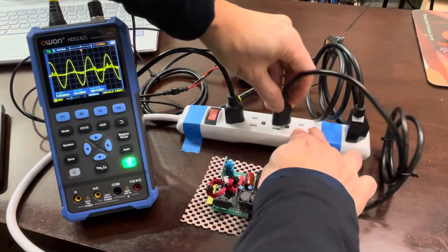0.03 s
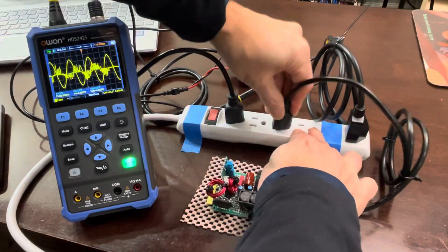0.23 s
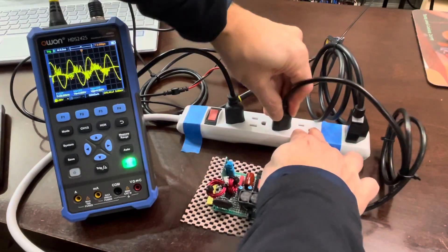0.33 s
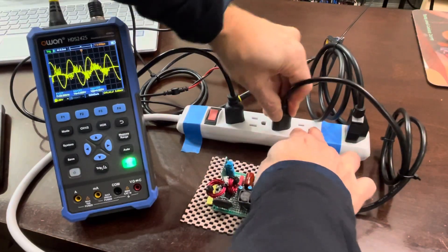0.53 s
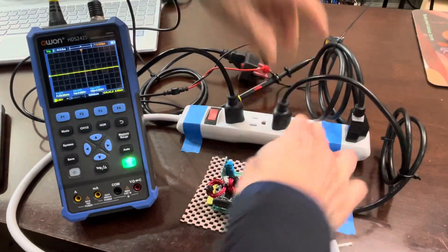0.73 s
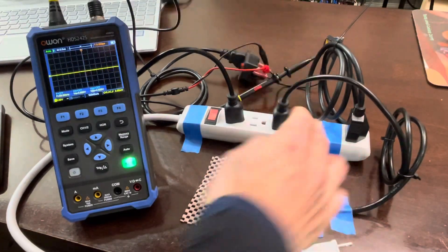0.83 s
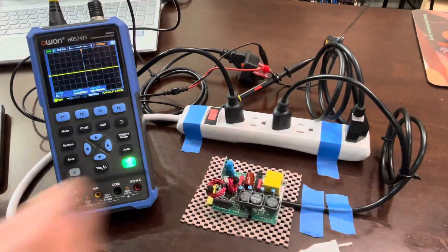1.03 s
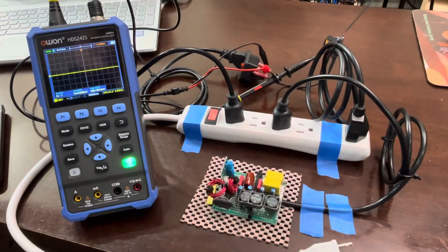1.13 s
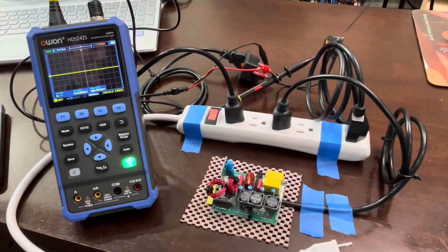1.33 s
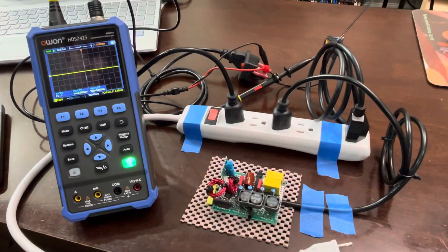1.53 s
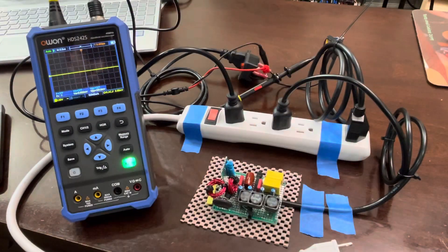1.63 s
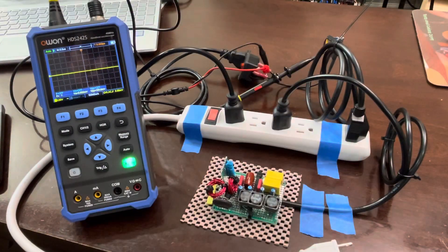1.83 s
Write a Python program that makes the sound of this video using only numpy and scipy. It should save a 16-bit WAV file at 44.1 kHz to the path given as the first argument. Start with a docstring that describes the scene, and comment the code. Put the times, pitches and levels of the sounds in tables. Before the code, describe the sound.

Close-miked plug going into a socket strip on a workbench, small scratchy contacts first, then a hard bright snap and low thump, weaker clicks afterwards, faint cloth brushing over quiet low ventilation rumble in a small room.

```python
"""A mains plug is pushed into a plastic power strip taped to a workbench, close to the microphone.
Prongs stick and slip as rough chirps; contacts crack with filtered noise and ring the casing's modes.
Each push thunks the modes of the bench top; the casing clicks again as the hands let go.
A sleeve brushes past as grainy cloth noise, and a diffuse small room answers plug and bench.
Beneath lie a low ventilation rumble, a wavering hum and faint hiss."""
import sys
import numpy as np
from scipy import signal
from scipy.fft import rfft, irfft, next_fast_len
from scipy.io import wavfile
from scipy.ndimage import map_coordinates

SR = 44100
rng = np.random.default_rng(int(sys.argv[2]) if len(sys.argv) > 2 else 0)


def store_wav(level_fs):
    """Save 16-bit WAV to argv[1]."""
    pcm = np.round(np.clip(np.atleast_2d(level_fs), -1, 1) * 32767)
    wavfile.write(sys.argv[1], SR, pcm.T.astype(np.int16))


N = 83790

# ventilation rumble spectrum: (frequency [Hz], relative level [dB])
RUMBLE_SPECTRUM = [(20, -13), (35, -9), (55, -0.5), (90, 1), (130, -3), (175, -5.5), (250, -21),
                   (400, -29.5), (700, -46), (2000, -70)]
# faint hiss spectrum: (frequency [Hz], relative level [dB])
HISS_SPECTRUM = [(100, 5.5), (500, 3), (1300, 0), (2500, -1.5), (6500, -5.5), (9000, -5), (10200, -18),
                 (11300, -2), (12300, -9), (13300, -29)]
# hum level before its random wavering: (time [s], level [dB])
HUM_LEVELS = [(0, -57), (.7, -58), (0.781, -50), (0.901, -65), (1.281, -61.5), (1.36, -54), (1.53, -49.5),
              (1.6, -61.5), (1.9, -62.5)]
# sleeve brushes: (start [s], rise [s], fall to -60 dB [s], level [dB], middle treble corner [Hz])
BRUSHES = [(0, 0.015, 0.29, -47, 2140), (0.422, 0.0075, 0.51, -51, 3130), (.96, 0.028, 0.6, -67, 4970),
           (1.178, .005, 0.2963, -54, 3770), (1.49, 0.098, 1.1, -65, 4944),
           (1.599, 0.068, 0.1645, -44, 3085)]
# brushing cloth spectrum: (frequency [Hz], relative level [dB])
CLOTH_SPECTRUM = [(40, -5.5), (100, 6), (350, 8.5), (600, 3), (1200, 0), (2500, 1), (4500, -4.5),
                  (9000, -6), (13000, -18)]
# cloth sliding lightly: (middle [s], half length [s], level [dB])
SLIDES = [(.79, .05, -83), (1.102, 0.027, -78.5), (1.22, 0.037, -65.5), (1.584, .025, -76),
          (1.739, 0.024, -68), (1.807, 0.048, -63)]
# sliding cloth spectrum: (frequency [Hz], relative level [dB])
SLIDE_SPECTRUM = [(500, -13), (3000, -4), (6500, -8.5), (8800, 8), (9600, 1), (10200, -11), (11200, 4),
                  (12100, -11), (13000, -35)]
# contacts of plug and casing:
# (time [s], casing ring level [dB], crack level [dB], dull above [Hz], ring pitch ratio [1])
CONTACTS = [(.0270, -37.5, -34, 6800, 1.02), (0.0298, -40.5, -36.5, 4500, 1.04),
            (0.0977, -60, -49, 3500, 1.08), (0.1664, -39.5, -57, 11100, 0.68),
            (0.1709, -71, -16, 14000, 1.44), (0.172, -16.5, -20.5, 14000, 1),
            (.1738, -36, -18.5, 12400, .8), (0.3491, -48, -51, 9000, 1.1), (0.3522, -34, -28, 1500, 0.84),
            (.5340, -63, -47, 1500, .85), (0.5556, -59, -54, 2000, .85), (0.587, -53.5, -46, 13200, 0.94),
            (0.5891, -36, -48, 2180, 0.77), (.6090, -56, -48.5, 13000, 1.06), (0.637, -57, -52, 1200, .7),
            (.6560, -64, -55, 1803, 0.74)]
# plastic casing modes at pitch ratio 1: (frequency [Hz], relative level [dB], t60 [s])
CASING_MODES = [(360, -14, 0.04), (727, -11, 0.02), (881.6, -4.5, .017), (1094, -1.5, 0.015),
                (1365, -1.5, .028), (1653, -17, .035), (2060, -11, 0.025), (2380, -14.5, 0.02),
                (2880, -12.5, .012), (3960, -14.5, .012), (4416, -7, .012), (5680, -8.5, .011),
                (8290, -9.5, .016), (9170, -10.5, .016), (11500, -4, .01)]
# contact crack spectrum: (frequency [Hz], relative level [dB])
CRACK_SPECTRUM = [(300, -13), (900, 2), (1600, -1.5), (4400, -2), (6500, -9), (8500, -0.5), (10000, -3),
                  (11200, 5.5), (12500, -3.5), (14500, -21)]
# pushes on the bench top: (time [s], level [dB], pitch of the push [Hz])
PUSHES = [(.029, -41, 302), (0.046, -39.5, 80), (0.101, -39.5, 140), (.176, -26, 200.2), (.184, -31, 80),
          (.218, -30, 70), (0.254, -42.5, 300), (0.311, -42.5, 131.3), (.353, -38, 160), (.452, -39, 66.9),
          (0.556, -46, 343.2), (0.59, -33, 139.7), (0.609, -47.5, 201.1), (1.098, -47.5, 65),
          (1.188, -52.5, 197), (1.635, -43, 70.8)]
# bench top modes: (frequency [Hz], relative level [dB], t60 [s])
BENCH_MODES = [(58, -0.5, 0.37), (106.8, 2, 0.18), (156.6, 1.5, 0.12), (180.5, -2.5, 0.2),
               (211.3, -4.5, 0.21), (257.7, -4, 0.15), (335.6, -6, .17), (390.9, -8, 0.19),
               (451, -15.5, 0.23)]
# prongs slipping in the spring contacts: (time [s], pitch [Hz], level [dB])
SLIPS = [(0.033, 1240, -44), (0.04, 1204, -38), (.048, 1570, -45.5), (0.057, 1810, -36.5),
         (.068, 1880, -51), (0.0991, 1547, -47)]
# room decay: (frequency [Hz], t60 [s])
ROOM_T60 = [(100, 0.34), (500, 0.53), (1400, 0.31), (3700, .33), (9700, .26), (13000, 0.18)]
# room colour: (frequency [Hz], gain [dB])
ROOM_GAIN = [(100, -23), (400, -3.5), (700, -6.5), (1350, -12), (1750, -3), (3500, -7), (6000, -6),
             (9000, -11), (10200, -15.5), (11500, -7.5), (12500, -18), (13300, -38)]

# *_LEFT_DB raises the left channel and lowers the right by the same amount
RUMBLE_DB, HISS_DB, HUM_HZ, BACKGROUND_LEFT_DB = -57.5, -76.5, 86.4, 1.5
CLOTH_GRAIN_DB, CLOTH_WIDTH, CLOTH_LEFT_DB = 0.5, 0.25, 3
CLOTH_DARKENS = 0.27  # a brush's corner starts this share above its middle and ends as far below
CRACK_RISE_S, CRACK_T60_S, CRACK_WIDTH = 0.0004, 0.013, 0.8
CASING_RISE_S, CASING_LEAD_S = 0.00035, 0.00003  # the ring reaches the left ear first by the lead
CLICK_LEFT_DB = 1
BENCH_RISE_S, BENCH_LEFT_DB = 0.002, 0.6
PUSH_LOSS_DB_PER_OCTAVE = 7  # for modes away from the pitch of the push
SLIP_RISE_S, SLIP_T60_S, SLIP_ROUGH_RAD = 0.0007, 0.018, 0.95
ROOM_DELAY_S, ROOM_BUILD_S = 0.0013, 0.0034
LOW_CUT_HZ, TOP_HZ = 48, 14454


def amp(db):
    """Decibels to gain."""
    return 10 ** (np.asarray(db) / 20)


def unit(x):
    """Scale to rms 1."""
    return x / np.sqrt(np.mean(x ** 2) + 1e-20)


def along(points, hz):
    """(Hz, value) points read on a log frequency axis."""
    f, v = np.transpose(points)
    return np.interp(np.log(hz + 1), np.log(f + 1), v)


def since(s):
    """Seconds since s, zero before it."""
    return np.maximum(np.arange(N) / SR - s, 0)


def filtered(x, response):
    """x shaped by a gain that is a function of frequency."""
    padded = next_fast_len(N + 8192)
    hz = np.fft.rfftfreq(padded, 1 / SR)
    return irfft(rfft(x, padded) * response(hz), padded)[..., :N]


def wobble(rate):
    """A smooth random curve through rate normal draws a second."""
    knots = rng.standard_normal(int(N * rate / SR) + 4)
    return map_coordinates(knots, [np.arange(N) * rate / SR])


def noise(spectrum, width):
    """Coloured stereo noise of rms 1; width is side over mid."""
    mid, side = filtered(rng.standard_normal((2, N)), lambda hz: amp(along(spectrum, hz)))
    return unit(np.array([mid + width * side, mid - width * side]))


def dull(x, corner_hz):
    """Soft contact loses its treble."""
    sos = signal.butter(2, min(corner_hz, 0.45 * SR), fs=SR, output="sos")
    return signal.sosfilt(sos, x + 1e-20)


def struck(t, rise, t60):
    """A quick rise and an exponential decay."""
    return (1 - np.exp(-t / rise)) * amp(-60 * t / t60)


def pan(left_db):
    """Gains of the two channels: left up, right down."""
    return amp([[left_db], [-left_db]])


def background():
    """Steady low-heavy rumble and faint hiss, with a hum that wavers in phase and level."""
    t = since(0)
    hum_level_db = np.interp(t, *np.transpose(HUM_LEVELS))
    hum = np.sin(2 * np.pi * HUM_HZ * t + 0.36 * wobble(6.9))
    hum = hum * amp(hum_level_db + 3.1 * wobble(15))
    rumble = amp(RUMBLE_DB) * noise(RUMBLE_SPECTRUM, width=0.14)
    hiss = amp(HISS_DB) * noise(HISS_SPECTRUM, width=1.0)
    return (rumble + hum + hiss) * pan(BACKGROUND_LEFT_DB)


def sleeve():
    """Grainy cloth: brushes that darken as they slow, and light hissing slides."""
    cloth = unit(noise(CLOTH_SPECTRUM, CLOTH_WIDTH) * amp(CLOTH_GRAIN_DB * wobble(220)))
    brushes = np.zeros((2, N))
    for s, rise, fall, db, corner_hz in BRUSHES:
        t = since(s)
        bright, dark = [
            filtered(cloth, lambda hz: 1 / np.sqrt(1 + (hz / (corner_hz * k)) ** 10))
            for k in (1 + CLOTH_DARKENS, 1 - CLOTH_DARKENS)]
        fast = np.exp(-t / (0.15 * fall))  # crossfades bright into dark
        brushes += amp(db) * struck(t, rise, fall) * (fast * bright + (1 - fast) * dark)
    speed = sum(amp(db) * np.exp(-0.5 * ((since(0) - s) / half) ** 2) for s, half, db in SLIDES)
    slides = speed * noise(SLIDE_SPECTRUM, width=0.93) * amp(2.21 * wobble(70))
    return (brushes + slides) * pan(CLOTH_LEFT_DB)


def clicks():
    """Each contact gives a short noisy crack and rings the modes of the casing."""
    out = np.zeros((2, N))
    cracks = noise(CRACK_SPECTRUM, CRACK_WIDTH)
    for s, ring_db, crack_db, corner_hz, ratio in CONTACTS:
        start = int(s * SR)
        span = slice(start, start + SR // 16)
        t = since(s)[span]
        ears = np.array([t, np.maximum(t - CASING_LEAD_S, 0)])
        ring = np.zeros_like(ears)
        for k, (hz, db, t60) in enumerate(CASING_MODES):
            mode = struck(ears, CASING_RISE_S, t60) * np.sin(2 * np.pi * hz * ratio * ears)
            ring += (-1) ** k * amp(db) * mode  # neighbouring modes start in opposite directions
        crack = cracks[:, span] * struck(t, CRACK_RISE_S, CRACK_T60_S)
        out[:, span] += dull(amp(ring_db) * ring + amp(crack_db) * crack, corner_hz)
    return out * pan(CLICK_LEFT_DB)


def bench():
    """The push passes through the strip into the bench top; slower pushes wake its lower modes."""
    out = np.zeros(N)
    for s, push_db, push_hz in PUSHES:
        start = int(s * SR)
        span = slice(start, start + SR // 2)
        t = since(s)[span]
        for hz, db, t60 in BENCH_MODES:
            octaves_away = abs(np.log2(hz / push_hz))
            level = amp(push_db + db - PUSH_LOSS_DB_PER_OCTAVE * octaves_away)
            out[span] += level * struck(t, BENCH_RISE_S, t60) * np.sin(2 * np.pi * hz * t)
    return out * pan(BENCH_LEFT_DB)


def prongs():
    """The prongs stick and slip on their way in: tiny chirps, roughened by a random phase."""
    rough = SLIP_ROUGH_RAD * wobble(1000)
    out = np.zeros(N)
    for s, hz, db in SLIPS:
        t = since(s)
        out += amp(db) * struck(t, SLIP_RISE_S, SLIP_T60_S) * np.sin(2 * np.pi * hz * t + rough)
    return out


def room(x):
    """Diffuse reflections: a decaying noise tail for each ear, the high treble dying first."""
    hz, t, cells = signal.stft(rng.standard_normal((2, SR // 2)), SR, nperseg=256)
    decay = amp(-60 * t / along(ROOM_T60, hz)[:, None])
    tail = signal.istft(cells * decay, SR, nperseg=256)[1]
    tail = tail * (1 - np.exp(-since(ROOM_DELAY_S)[:tail.shape[1]] / ROOM_BUILD_S))
    wet = signal.fftconvolve(x, tail / np.linalg.norm(tail[0]), axes=1)[:, :N]
    return filtered(wet, lambda hz: amp(along(ROOM_GAIN, hz)))


def scene(count=3):
    """Plug and bench up close; the cracks leave differently in count directions and meet in the room."""
    body = prongs() + bench()
    reflections = sum(room(clicks() + body) for _ in range(count)) / np.sqrt(count)
    return clicks() + body + reflections + sleeve() + background()


def record(dry):
    """The recorder cuts the deepest bass and falls off steeply above its band limit."""
    low_cut = signal.butter(3, LOW_CUT_HZ, "highpass", fs=SR, output="sos")
    dry = signal.sosfilt(low_cut, dry)
    return filtered(dry, lambda hz: 1 / np.sqrt(1 + (hz / TOP_HZ) ** 60))


dry = scene()
out = record(dry)
store_wav(out)
```